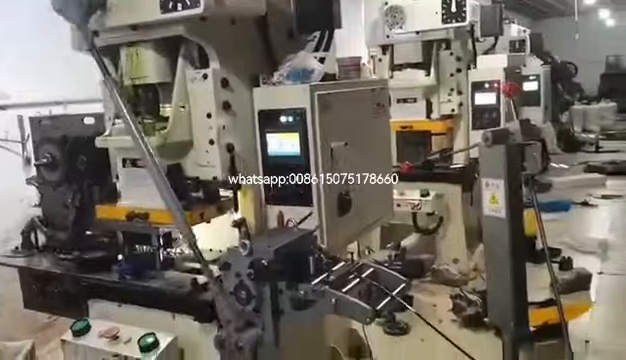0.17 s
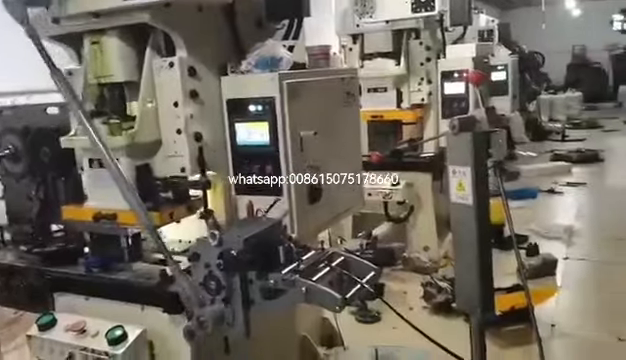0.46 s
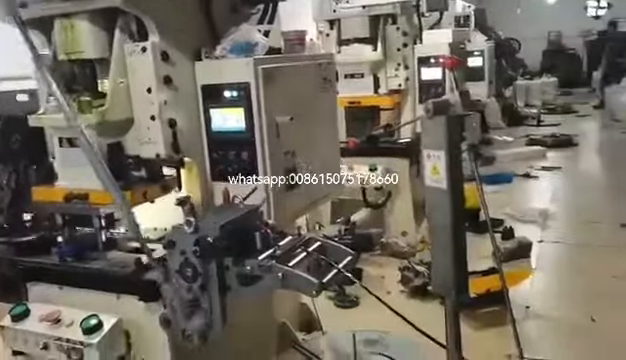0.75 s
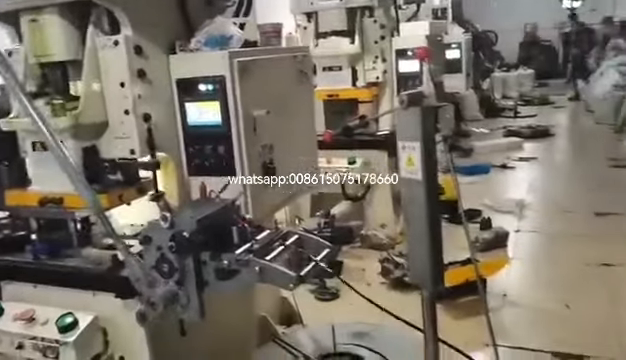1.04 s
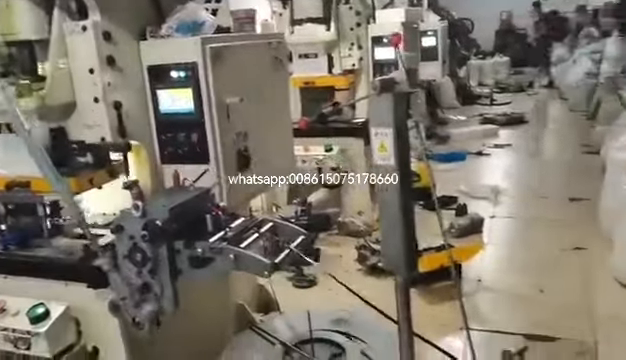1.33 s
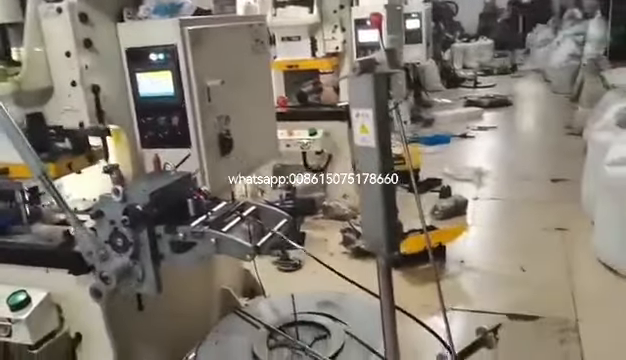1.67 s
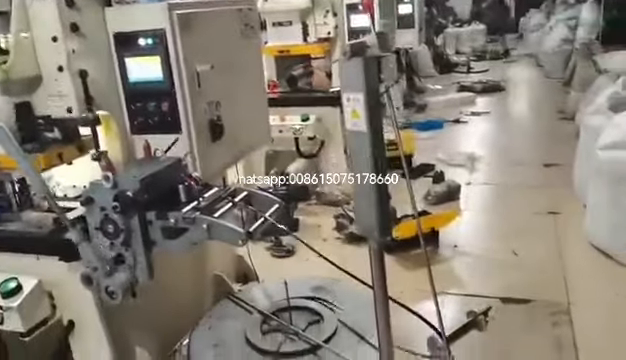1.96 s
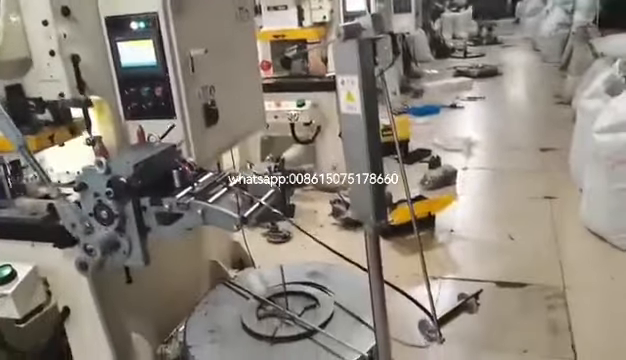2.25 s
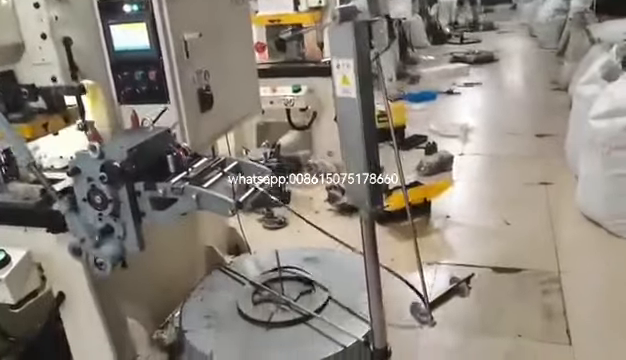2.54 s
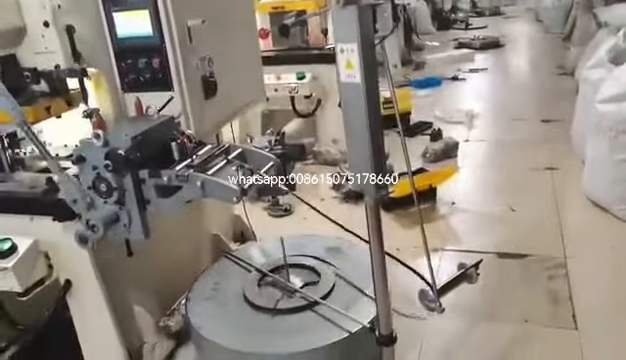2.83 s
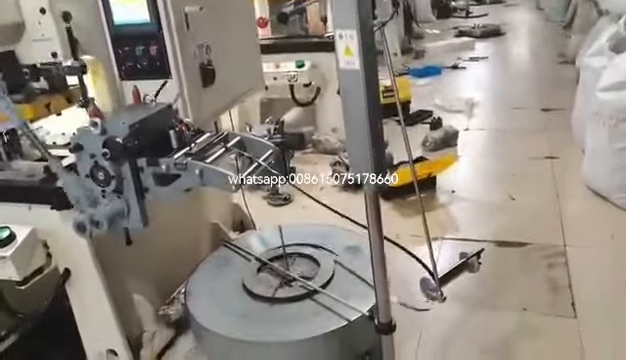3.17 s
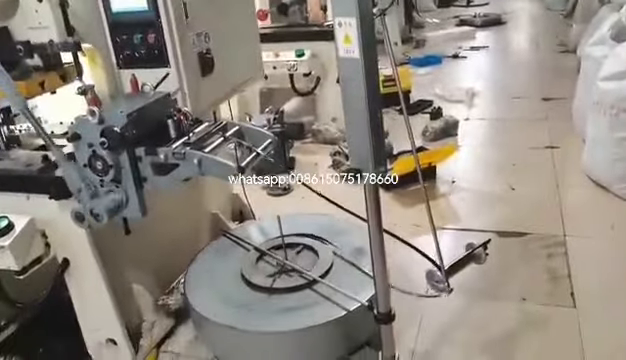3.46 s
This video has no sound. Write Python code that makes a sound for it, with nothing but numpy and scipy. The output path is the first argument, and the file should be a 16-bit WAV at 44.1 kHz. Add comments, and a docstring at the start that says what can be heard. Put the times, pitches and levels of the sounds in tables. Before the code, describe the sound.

Heavy punch press thumps steadily while a second press clatters and puffs air in a workshop

```python
"""A heavy punch press thumps about every 0.46 s in a hard-walled workshop: quick knocks on a modal frame, then
a shudder of random impacts. A second press, out of step, clatters about every 0.55 s: impacts stir its die,
harder blows clank, the strip scrapes, and filtered noise makes the air puffs. Decaying sines boom and ring
elsewhere; steady and gated sines are the motors, a lingering ring of the die, the gear and drives; shaped noise
is the floor rumble and din."""
import sys
import numpy as np
from scipy import signal
from scipy.fft import rfft, irfft
from scipy.io import wavfile
from scipy.ndimage import uniform_filter1d

SR = 44100
rng = np.random.default_rng(int(sys.argv[2]) if len(sys.argv) > 2 else 0)


def to_wav(s):
    """Save 16-bit WAV."""
    ch = np.atleast_2d(s).T  # columns
    pcm = np.round(np.clip(ch, -1, 1) * 32767)  # PCM
    wavfile.write(sys.argv[1], SR, pcm.astype(np.int16))


N = 158760
TIME = np.arange(N) / SR


def amp(db):
    """Logarithmic level: decibels to amplitude gain."""
    return 10 ** (np.asarray(db) / 20)


def evened(x):
    """Power normalisation: scales to unit rms."""
    return x / np.sqrt(np.mean(x ** 2) + 1e-20)


def read(points, hz):
    """Logarithmic frequency scale: interpolates a table along it."""
    f, value = np.transpose(points)
    return np.interp(np.log(hz + 1), np.log(f + 1), value)


def level_curve(points):
    """Amplitude envelope: level interpolated linearly in decibels over time."""
    return amp(np.interp(TIME, *np.transpose(points)))


def add(mix, s, sound):
    """Superposition: mixes a sound in at time s, trimmed at both ends."""
    at = round(s * SR)
    sound = sound[max(-at, 0):]
    part = mix[max(at, 0):][:len(sound)]
    part += sound[:len(part)]


def colour(x, spectrum):
    """Linear filtering: weights the spectrum of a signal, at unit rms."""
    gain = amp(read(spectrum, np.fft.rfftfreq(N, 1 / SR)))
    return evened(irfft(rfft(x) * gain, N))


def drift(rate):
    """Low-passed random process: Gaussian roll-off at rate (Hz), unit rms."""
    count, step_s = 4096, .001
    roll_off = np.exp(-(np.fft.rfftfreq(count, step_s) / rate) ** 2)
    slow = irfft(rfft(rng.standard_normal(count)) * roll_off)
    return evened(np.interp(TIME, np.arange(count) * step_s, slow))


def tone(hz, waver):
    """Phase modulation: a slightly unsteady sine of unit rms, waver in radians rms."""
    return np.sqrt(2) * np.sin(2 * np.pi * hz * TIME + waver * drift(rate=31))


# depth of the noise patches, smaller in the bass: f/Hz, factor
PATCH_DEPTH = [(300, .3), (1200, 1.1), (5000, 1.25)]


def noise(spectrum, patchy_db, size=8):
    """Non-stationary noise: brief, narrow patches, like parts that ring for a moment."""
    hz, _, z = signal.stft(rng.standard_normal(N), SR, nperseg=1024, noverlap=768)
    across_hz = uniform_filter1d(rng.standard_normal(z.shape), size, 0)
    patches = evened(uniform_filter1d(across_hz, size=5, axis=1))
    z = z * amp(patchy_db * read(PATCH_DEPTH, hz)[:, None] * patches)
    patchy = signal.istft(z, nperseg=1024, noverlap=768)[1][:N]
    return colour(patchy, spectrum)


def clicks(per_s, spread_db, smear_s=0.00094, count=10):
    """Shot noise: random impacts, each scattered along one of several decaying noise paths."""
    sizes = amp(spread_db * np.minimum(rng.exponential(1, N), 3.5))
    train = sizes * (rng.random(N) < per_s / SR)
    t = TIME[:1024]
    paths = rng.standard_normal((count, len(t))) * np.exp(-t / smear_s)
    path = rng.integers(0, count, N)
    return sum(signal.oaconvolve(train * (path == k), p)[:N] for k, p in enumerate(paths))


def ring(modes, rise_s, detune=0, pitch=1):
    """Modal superposition: decaying sines of a struck object behind a soft onset."""
    t = TIME[:SR // 2]
    body = np.zeros(len(t))
    for hz, db, t60 in modes:
        mode_hz = hz * pitch * (1 + detune * rng.standard_normal())
        body += amp(db - 60 * t / t60) * np.sin(2 * np.pi * mode_hz * t)
    return (1 - np.exp(-t / rise_s)) * body


def swell(start, rise, t60):
    """Exponential energy decay after a straight rise."""
    decay = np.exp(-np.log(1000) * np.maximum(TIME - start - rise, 0) / t60)
    return np.clip((TIME - start) / rise, 0, 1) * decay


# reverberation time of the workshop: f/Hz, t60/s
REVERBERATION = [(60, 0.26), (300, 0.99), (1500, 0.78), (5000, 0.13), (12000, 0.57)]


def hall(x, wet_db, size=20):
    """Diffuse reverberation: scattered reflections, each band dying at its own speed."""
    taps = np.zeros(SR)
    # one reflection of random sign in each slot of `size` samples, from 5 ms on
    at = np.arange(SR // 200, SR - size, size)
    taps[at + rng.integers(0, size, len(at))] = rng.choice([-1., 1.], len(at))
    hz, t, z = signal.stft(taps, SR, nperseg=256)
    decay = np.exp(-np.log(1000) * t / read(REVERBERATION, hz)[:, None])
    tail = signal.istft(z * decay, SR, nperseg=256)[1]
    return x + amp(wet_db) * signal.fftconvolve(x, tail / np.linalg.norm(tail))[:N]


# spectrum of the hall's wash: f/Hz, relative level per Hz/dB
WASH_SPECTRUM = [(20, -41), (40, -31), (65, -32.5), (85, -12), (150, -6), (240, 3.5), (370, -1), (520, -4),
                 (680, -6), (850, -5), (1200, -9), (1700, -10.5), (2400, -8.5), (3200, -14), (3700, -13.5),
                 (4800, -16), (5800, -14), (7300, -16), (8800, -42.5), (10500, -21.5), (12500, -32.5)]
# spectrum of the far ticks: f/Hz, relative level per Hz/dB
TICK_SPECTRUM = [(20, -50), (200, -29), (600, 6), (1200, -3.5), (2400, 0), (5800, -0.5), (7300, -20),
                 (8800, -83), (12000, -13)]
DIN_DB = -24


def din():
    """Incoherent summation: many far machines blur into a wash with small ticks in it."""
    wash = noise(WASH_SPECTRUM, patchy_db=2.8)
    ticks = colour(clicks(per_s=350, spread_db=4.0, smear_s=0.0013), TICK_SPECTRUM)
    return amp(DIN_DB + .5 * drift(rate=15)) * evened(wash + amp(-13) * ticks)


# steady hums of motors and drives, and the die's steady ring at 3386 Hz: f/Hz, rms level/dB, level wavering/dB
HUMS = [(68, -47, 2), (238, -43, 2), (414, -42, 2), (790, -47, 2), (3386, -49, 2), (4463, -52, 3),
        (5093, -52, 3)]


def motors():
    """Periodic excitation: motors and flywheels hum as sines wavering in level and phase; the die keeps up a
    faint ring at 3386 Hz."""
    hum = np.zeros(N)
    for hz, db, waver_db in HUMS:
        waver = amp(waver_db * np.tanh(drift(rate=4.2)))
        sine = np.sin(2 * np.pi * hz * TIME + 0.74 * drift(rate=25))
        hum += amp(db) * evened(waver * sine)
    return hum


GEAR_HZ = 1701
LOW_HZ, HIGH_HZ = 4463, 5093  # the two drive pitches
SQUEAL_EDGE_S = 0.023
# level of the thin gear whine: t/s, level/dB
GEAR_LEVEL = [(.06, -39), (.12, -37), (.19, -37), (.24, -43), (.28, -35), (.38, -36), (.45, -41),
              (.62, -52), (.72, -39), (.85, -47), (2.3, -49), (2.43, -41), (2.52, -48), (3.6, -48)]
# squeals of the motor drives: start t/s, length/s, f/Hz, level/dB
DRIVE_SQUEALS = [(.05, .16, LOW_HZ, -36), (0.256, .1, LOW_HZ, -41), (0.499, 0.062, LOW_HZ, -29.5),
                 (0.718, .11, LOW_HZ, -34), (0.952, 0.08, LOW_HZ, -32), (1.18, .09, LOW_HZ, -44),
                 (1.644, 0.06, LOW_HZ, -33), (1.757, 0.11, LOW_HZ, -34.5), (1.863, 0.098, LOW_HZ, -37),
                 (2.097, 0.11, LOW_HZ, -39.5), (2.415, 0.1, LOW_HZ, -39), (2.323, 0.088, LOW_HZ, -32.5),
                 (2.606, 0.071, LOW_HZ, -38), (2.775, 0.13, LOW_HZ, -36.5), (3.31, 0.065, LOW_HZ, -34),
                 (3.567, 0.061, LOW_HZ, -31), (.1, 0.13, HIGH_HZ, -38), (0.542, 0.077, HIGH_HZ, -33),
                 (.75, .16, HIGH_HZ, -49), (0.944, 0.14, HIGH_HZ, -37), (1.172, 0.087, HIGH_HZ, -46),
                 (1.4, .07, HIGH_HZ, -38), (1.632, 0.084, HIGH_HZ, -30.5), (1.865, 0.073, HIGH_HZ, -36.5),
                 (2.05, 0.11, HIGH_HZ, -36.5), (2.698, 0.055, HIGH_HZ, -35), (2.96, 0.11, HIGH_HZ, -44),
                 (3.397, 0.049, HIGH_HZ, -37)]


def whine():
    """Tonal radiation: a gear whines thinly; the motor drives squeal on and off at two pitches."""
    out = level_curve(GEAR_LEVEL) * tone(GEAR_HZ, waver=0.55)
    for s, length, hz, db in DRIVE_SQUEALS:
        gate = np.clip(np.minimum(TIME - s, s + length - TIME) / SQUEAL_EDGE_S, 0, 1)
        out += gate * amp(db + 1.5 * drift(rate=59)) * tone(hz, waver=.9)
    return out


# level of the bass rumble: t/s, level/dB
RUMBLE_LEVEL = [(.06, -34), (.12, -36), (.22, -58), (.33, -53), (.38, -40), (.55, -28.5), (.68, -68),
                (.78, -33.5), (1.18, -36.5), (1.25, -44), (1.35, -68), (1.58, -25.5), (1.67, -53),
                (1.75, -32), (1.92, -38), (2.04, -44), (2.24, -28), (2.4, -35.5), (2.53, -49), (2.64, -26),
                (2.8, -35.5), (2.9, -51), (3.05, -35), (3.6, -33)]
# spectrum of the shaking floor: f/Hz, relative level per Hz/dB
FLOOR_SPECTRUM = [(20, -26), (38, -7), (50, -1), (68, 7.5), (82, 2), (105, 2.5), (200, 3), (1000, -62)]


def rumble():
    """Structure-borne sound: the floor shakes under the machines, as bass noise of changing level."""
    return level_curve(RUMBLE_LEVEL) * colour(rng.standard_normal(N), FLOOR_SPECTRUM)


# deep booms from further down the hall: t/s, f/Hz, level/dB, t60/s
FAR_BOOMS = [(0.086, 71.3, -15, 0.33), (2.216, 70, -17.5, 0.29), (2.664, 163, -1, 0.24),
             (2.735, 160, -30, 0.12), (3.13, 175.4, -11, 0.39), (3.223, 151, 3, 0.15),
             (3.289, 127.4, -3.5, 0.22)]
# loose metal parts ringing: t/s, f/Hz, level/dB, t60/s
LOOSE_PARTS = [(0.147, 1712, -25, 0.2), (0.282, 1714, -24.5, 0.2), (1.678, 3880, -47, 0.039),
               (2.066, 2340, -26.5, 0.14), (2.12, 2016, -28, 0.092), (2.343, 2420, -22, 0.15),
               (2.381, 2480, -19.5, 0.14), (3.21, 782, -27, 0.17)]


def other_work():
    """Free vibration: booms and ringing parts around the workshop, one decaying mode each."""
    booms, pings = np.zeros((2, N))
    for s, hz, db, t60 in FAR_BOOMS:
        add(booms, s, ring([(hz, db, t60)], rise_s=0.083))
    for s, hz, db, t60 in LOOSE_PARTS:
        add(pings, s, ring([(hz, db, t60)], rise_s=0.0019))
    return booms + hall(pings, wet_db=1)


# air puffs: peak t/s, level/dB, rise time constant/s, fall time constant/s
AIR_PUFFS = [(0.34, -23.5, 0.0079, 0.0089), (.39, -27, 0.019, 0.07), (.945, -24, 0.066, 0.039),
             (1.49, -22, 0.028, 0.034), (2.04, -19, 0.014, 0.037), (2.599, -15.5, .012, 0.015),
             (3.15, -19.5, 0.0086, 0.02), (3.245, -26.5, 0.045, 0.061)]
# spectrum of the air jet: f/Hz, relative level per Hz/dB
JET_SPECTRUM = [(300, -40), (2000, -35), (4800, -9), (5900, 5.5), (6800, 6), (7700, 0), (8800, -20),
                (10000, 0.5), (12000, -5.5)]


def air():
    """Turbulent jet noise: hiss swells and dies exponentially as a nozzle opens and shuts."""
    flow = np.zeros(N)
    for s, db, rise, fall in AIR_PUFFS:
        flow += amp(db) * np.exp(np.minimum((TIME - s) / rise, (s - TIME) / fall))
    return hall(flow * noise(JET_SPECTRUM, patchy_db=2.0), wet_db=-10)


SCRAPE_WIDTH_HZ = 190  # roll-off of the fuzz on each side of the pitch
# rising scrapes of the metal strip: start t/s, length/s, from f/Hz, to f/Hz, level/dB
STRIP_SCRAPES = [(1.456, .1, 2015, 2574, -27), (3.171, 0.23, 1944, 3060, -30.5)]


def scrapes():
    """Friction excitation: the strip drags through its guides, a fuzzy resonance that climbs."""
    out = np.zeros(N)
    for s, length, from_hz, to_hz, db in STRIP_SCRAPES:
        along = np.clip((TIME - s) / length, 0, 1)
        phase = 2 * np.pi * np.cumsum(from_hz + (to_hz - from_hz) * along) / SR
        # two independent drifts in quadrature make a narrow noise band around the pitch
        band = drift(SCRAPE_WIDTH_HZ) * np.cos(phase) + drift(SCRAPE_WIDTH_HZ) * np.sin(phase)
        out += amp(db) * np.sin(np.pi * along) * band
    return out


CRACK_T60_S = .028
# sharp steel clanks: t/s, ring level/dB, crack level/dB, pitch ratio
STEEL_CLANKS = [(.084, -36, -25, 1), (.18, -31, -40, 1.01), (.3267, -36, -22, 1), (0.346, -20, -28, 1),
                (.627, -45, -28, 1), (.869, -21, -21, 1.015), (1.389, -29, -25, .995),
                (1.416, -31, -22, .99), (1.452, -23, -28, 1.025), (1.784, -45, -26, 1),
                (1.962, -29, -24, 1.015), (2.038, -38, -24, 1), (2.245, -40, -25, 1),
                (2.5095, -24, -23, .995), (2.545, -23, -28, 1), (2.981, -42, -27, 1), (3.033, -27, -28, 1),
                (3.059, -29, -22, 1.015), (3.555, -28, -36, 1.01)]
# spectrum of the crack: f/Hz, relative level per Hz/dB
CRACK_SPECTRUM = [(100, -25), (700, -10), (1500, -10), (2500, -3), (4000, -8), (7000, -13), (8800, -30),
                  (12000, -25)]
# modes of the die, also stirred by the second press: f/Hz, relative level/dB, t60/s
DIE_MODES = [(1060, -15, 0.053), (1910, -12, .07), (2020, -8, 0.12), (2440, -12, 0.17), (2715, -9, 0.14),
             (3386, -9, .22), (3530, -2, .07), (3585, 3, 0.11), (3650, 1.5, 0.1), (3740, -3, .06),
             (3860, -5, .06), (5670, -12, .12), (6230, -13, .12)]


def clanks():
    """Impact excitation: harder blows of the tooling crack and leave the die ringing."""
    out = np.zeros(N)
    crack = colour(rng.standard_normal(N), CRACK_SPECTRUM)
    for s, ring_db, crack_db, pitch in STEEL_CLANKS:
        add(out, s, amp(ring_db) * ring(DIE_MODES, rise_s=.0015, detune=0.001, pitch=pitch))
        out += amp(crack_db) * swell(s, rise=.0012, t60=CRACK_T60_S) * crack
    return hall(out, wet_db=-14)


# clatter of the second press: t/s, relative level/dB, rise/s, t60/s
CLATTER_BURSTS = [(0.062, -21, 0.029, 0.36), (0.323, -21.5, 0.016, 0.41), (0.863, -21, 0.039, 0.92),
                  (1.389, -19.5, 0.041, 0.47), (1.944, -21.5, 0.018, 1), (2.503, -21.5, 0.01, 1),
                  (3.039, -20.5, 0.02, 0.7)]
# spectrum of the clatter: f/Hz, relative level per Hz/dB
CLATTER_SPECTRUM = [(30, -11), (130, 16), (400, 15.5), (750, 9.5), (1080, 13.5), (1550, 11), (1950, 13.5),
                    (2300, 8.5), (2650, 10.5), (3100, 4), (3650, 3.5), (4200, 12), (4900, 0), (5800, 10.5),
                    (7500, -28), (12000, -9)]


def second_press():
    """Forced vibration: strip and tooling rattle in bursts of small impacts that stir the die."""
    effort = sum(amp(db) * swell(s, rise, t60) for s, db, rise, t60 in CLATTER_BURSTS)
    impacts = clicks(per_s=1500, spread_db=0.0)
    die = ring(DIE_MODES, rise_s=0.00015)
    direct = effort * colour(impacts, CLATTER_SPECTRUM)
    stirred = signal.fftconvolve(effort * evened(impacts), die / np.linalg.norm(die))[:N]
    return amp(0.83) * hall(direct + amp(-13) * stirred, wet_db=-8.5)


KNOCK_RISE_S, KNOCK_JITTER_S = 0.0022, .0001  # onset time constant, timing deviation
# heavy press strokes: t/s, knock level/dB, shudder level/dB, pitch ratio
PRESS_STROKES = [(.377, -14, -20.5, .95), (0.8345, -12, -25.5, 1), (1.292, -10.5, -24, 1.02),
                 (1.7505, -10.5, -25, 1), (2.208, -11.5, -22, .99), (2.6645, -11, -25, .98),
                 (3.121, -11, -21.5, 1), (3.577, -13, -20, 1)]
# knocks within a stroke: delay t/s, level relative to the stroke/dB
STROKE_KNOCKS = [(-.017, -16), (.002, 0), (.0195, -.5), (0.0335, -1.5), (.052, -12), (0.122, -12)]
# lighter knocks of the feed between strokes: t/s, level/dB
LIGHT_KNOCKS = [(.058, -17), (.71, -28), (.739, -27), (1.02, -23), (1.113, -27), (1.467, -23), (2.169, -25),
                (2.522, -21), (2.94, -26), (3.319, -21), (3.392, -21)]
# modes of the heavy frame: f/Hz, relative level/dB, t60/s
FRAME_MODES = [(160, -12, 0.14), (244.4, -1.5, 0.07), (274, -3, 0.11), (343, 1, 0.06), (372, -4, .07),
               (420, -7, 0.05), (605, -25, 0.15), (800, -3, 0.021), (1222, -13, .07)]
# spectrum of the shudder of frame and feed: f/Hz, relative level per Hz/dB
SHUDDER_SPECTRUM = [(30, -36), (100, -50), (155, 7.5), (240, 10.5), (330, 5), (480, 5.5), (680, -8),
                    (860, -3.5), (1400, -4.5), (3000, -13.5), (12000, -95)]


def heavy_press():
    """Modal response to impact: each stroke knocks the frame several times; frame and feed shudder on."""
    knocks = np.zeros(N)
    for s, db, _, pitch in PRESS_STROKES:
        for delay, knock_db in STROKE_KNOCKS:
            at = s + delay + KNOCK_JITTER_S * rng.standard_normal()
            knock = ring(FRAME_MODES, KNOCK_RISE_S, detune=.004, pitch=pitch)
            add(knocks, at, amp(db + knock_db) * knock)
    for s, db in LIGHT_KNOCKS:
        add(knocks, s, amp(db) * ring(FRAME_MODES, KNOCK_RISE_S, detune=.04))
    shudder = sum(amp(db) * swell(s, rise=0.082, t60=0.76) for s, _, db, _ in PRESS_STROKES)
    rattle = colour(clicks(per_s=1500, spread_db=1), SHUDDER_SPECTRUM)
    return hall(knocks, wet_db=-13) + shudder * rattle


def scene():
    """Superposition at one microphone: all sources summed, the same in both channels."""
    background = din() + motors() + whine() + rumble() + other_work()
    mono = background + air() + scrapes() + clanks() + second_press() + heavy_press()
    return np.array([mono, mono])


START_S = 0.0564
LOW_CUT_HZ, HIGH_CUT_HZ = 18, 12200


def record(dry):
    """Band limitation: silence until START_S, then a 2 ms fade-in; the deepest bass and top treble are lost."""
    opened = np.clip((TIME - START_S) / .002, 0, 1)
    low_cut = signal.butter(2, LOW_CUT_HZ, "highpass", fs=SR, output="sos")
    thinned = signal.sosfilt(low_cut, dry * opened)
    high_cut = signal.firwin(511, HIGH_CUT_HZ, window=("kaiser", 9), fs=SR)
    return signal.oaconvolve(thinned, high_cut[None], "same")


dry = scene()
out = record(dry)
to_wav(out)
```